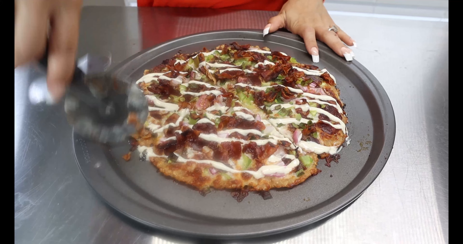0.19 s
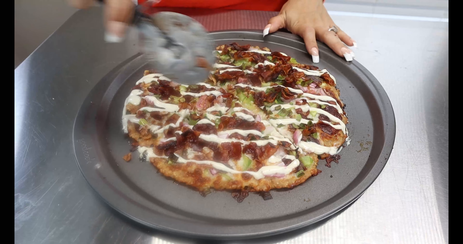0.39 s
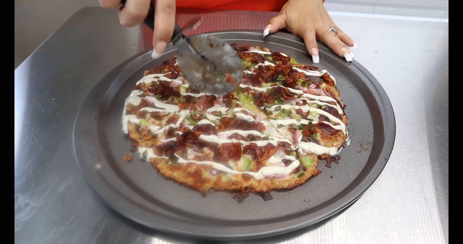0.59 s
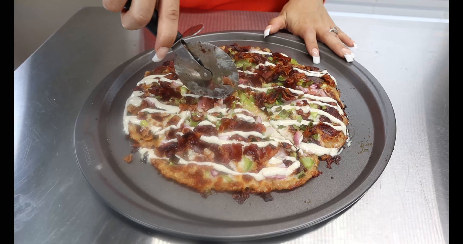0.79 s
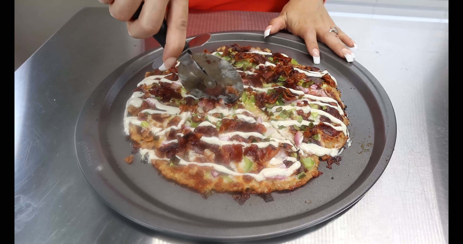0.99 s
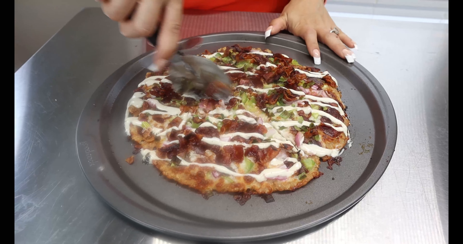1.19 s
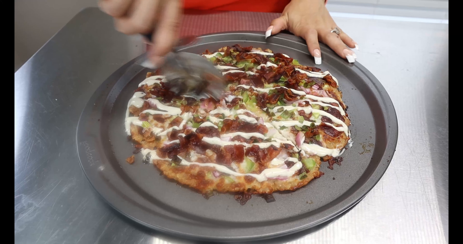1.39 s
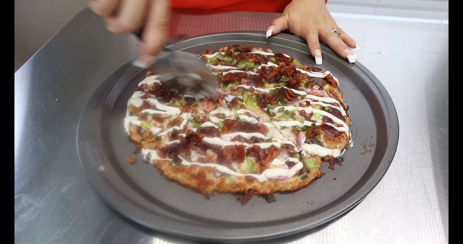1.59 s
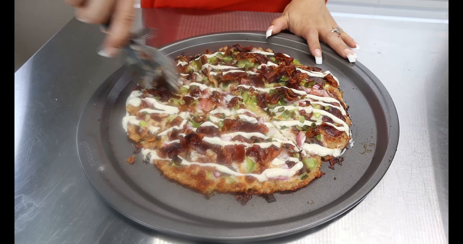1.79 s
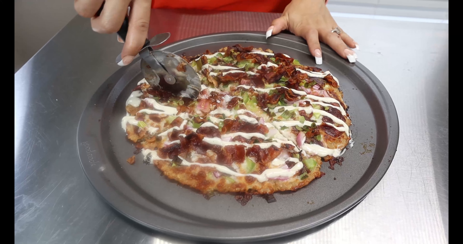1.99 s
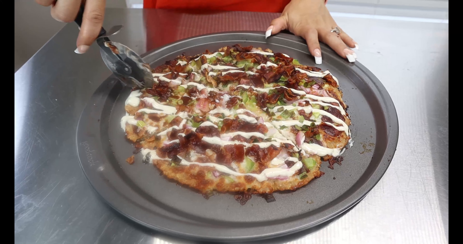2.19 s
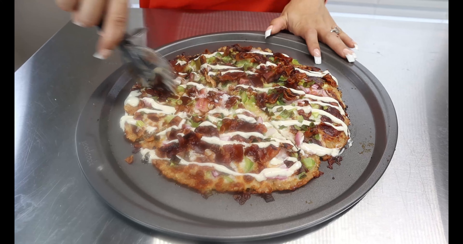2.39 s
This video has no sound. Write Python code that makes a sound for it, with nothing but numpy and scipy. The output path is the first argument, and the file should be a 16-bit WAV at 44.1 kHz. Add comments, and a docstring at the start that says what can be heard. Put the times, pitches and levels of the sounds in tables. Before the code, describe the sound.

Pizza cutter on a metal pan, close, in a quietly murmuring kitchen. Soft rolling and faint blade ticks open; at 0.24 s a hard, short, distorted clank bursts out, its echo fading over about half a second. The loose blade rattles around 0.74 s. A crust snap hits at 1.05 s, a pan knock at 1.2 s, then quieter rumbling, crunching strokes repeat from 1.33 to 2.4 s.

```python
"""Over the low murmur of a kitchen, a soft roll and ticks of a loose blade lead to a hard clank:
a pizza wheel lands on a metal pan, close to the microphone, and the kitchen rings on.
The blade bites into the crust, knocks the pan on the counter and rolls in short crunching strokes.
Blows and rings are dying sine modes; cracks, ticks, snaps and knocks are coloured noise bursts;
rolling is swelling trains of random clicks, and the air and the pan's drone are shaped noise."""
import sys
import numpy as np
from scipy import signal
from scipy.fft import rfft, irfft
from scipy.io import wavfile
from scipy.ndimage import uniform_filter1d

SR = 44100
rng = np.random.default_rng(int(sys.argv[2]) if len(sys.argv) > 2 else 0)


def waveform_to_disk(signal):
    """Save audio, clipped to [-1, 1], as 16-bit WAV at the path in sys.argv[1]."""
    frames = np.transpose(np.atleast_2d(signal))
    scaled = np.clip(frames, -1, 1) * 32767
    samples = np.round(scaled).astype(np.int16)
    wavfile.write(sys.argv[1], SR, samples)


N = 110250
T = np.arange(N) / SR
HZ = np.fft.rfftfreq(N, 1 / SR)

# room air: (frequency [Hz], relative density [dB])
AIR_SPECTRUM = [(20, -51), (60, -8.5), (130, 10), (200, -1.5), (310, 5.5), (500, -2.5), (800, -7),
                (1600, -13), (4000, -21.5), (15000, -42.5)]
AIR_DB = -51
# decay of the kitchen: (frequency [Hz], t60 [s])
KITCHEN_DECAY = [(80, 0.55), (500, 0.48), (2500, 0.67), (6500, 0.62), (10000, 0.52), (15000, 0.36)]
TICK_ROOM_DB, CUT_ROOM_DB, KNOCK_ROOM_DB = -17, -13, -11.5  # sends to the room

# drone of the pan while the wheel presses on it: (time [s], level [dB])
PRESSURE_LEVEL = [(0, -48), (.4, -52.5), (.9, -58.5), (1.15, -48.5), (1.35, -54), (1.65, -42.5),
                  (1.8, -48.5), (2.05, -44.5), (2.5, -47.5)]
# its colour: (frequency [Hz], relative density [dB])
DRONE_SPECTRUM = [(25, -14), (55, 2.5), (120, -2), (152, -10.5), (174, 1.5), (200, -4.5), (240, 6.5),
                  (300, -5), (480, -6.5), (700, -19), (2000, -73.5)]

# modes of the disc: (frequency [Hz], relative level [dB], t60 [s])
DISC_MODES = [(3400, -12, .04), (5380, 0, .075), (8220, -6, .05), (10850, -5, .08), (12700, -9, .07)]
DISC_PEAK_DB, DISC_WIDTH_HZ = 2.5, 220  # lift at a mode of 0 relative distance, half-width
# ticks of the loose blade: (time [s], level [dB], centre [Hz], t60 [s])
BLADE_TICKS = [(0.032, -40, 5500, 0.014), (.067, -42, 12300, 0.025), (.2088, -40, 3150, 0.024),
               (0.309, -34, 12400, 0.031), (0.4, -32, 12200, 0.017), (0.457, -34, 10300, 0.03),
               (0.471, -44, 13000, 0.018), (.623, -37, 9140, 0.01), (0.711, -46, 6950, 0.009),
               (0.7302, -46, 5230, 0.022), (0.7385, -26, 6270, 0.023), (0.7443, -34, 4223, 0.029),
               (.751, -32, 4550, 0.041), (0.7544, -28.5, 3280, 0.0099), (.7703, -42, 12100, 0.0079),
               (.905, -47.5, 9000, .005), (0.9845, -31.5, 5850, 0.01), (0.9855, -34, 2220, 0.016),
               (.9922, -41.5, 6600, 0.019), (1.3424, -33.5, 7400, 0.0032), (1.4613, -44.5, 7090, 0.0033),
               (1.6682, -42.5, 12000, 0.0047), (2.4555, -47.5, 10930, 0.0068)]
TICK_OCTAVES = 0.92  # from the centre to the half-power point
TICK_CLICK = .7  # first push relative to the rough part
# glancing touches that ring the disc: (time [s], level [dB], tilt [dB per octave])
DISC_RINGS = [(0.0275, -40.5, -6.5), (0.397, -48, 11), (0.7286, -44, -12), (0.7378, -44, -3)]

# snaps of the crust: (time [s], level [dB], centre [Hz], t60 [s])
CRUST_SNAPS = [(1.0472, -19.5, 5830, 0.015), (1.043, -36, 4440, 0.024), (1.057, -38, 5450, 0.015),
               (1.1563, -32.5, 5960, 0.006), (1.387, -43.5, 6050, 0.028), (1.524, -43, 7400, 0.034),
               (1.5392, -40.5, 8130, 0.04), (1.538, -35.5, 1770, 0.09), (1.8664, -38, 6600, 0.0087),
               (1.863, -36.5, 1963, 0.058), (1.886, -41, 4250, 0.032), (1.9318, -41.5, 6900, 0.029),
               (2.041, -38.5, 5140, 0.008), (2.171, -47, 5450, 0.011), (2.1934, -45, 5600, 0.02),
               (2.407, -43, 5050, 0.0043)]
SNAP_OCTAVES, SNAP_SKIRT_DB = 0.085, -16  # width of the peak, broad part beneath it

# knocks of the pan on the counter: (time [s], level [dB], t60 [s], tilt [dB per octave])
PAN_KNOCKS = [(1.047, -35, 0.078, -6.5), (1.0615, -38.5, 0.12, -4), (1.1931, -19.5, 0.023, 3.5),
              (1.1983, -30, 0.34, 1), (1.2272, -29, 0.037, 3)]
# their common colour: (frequency [Hz], relative density [dB])
KNOCK_SPECTRUM = [(25, -14), (70, 12), (150, 7.5), (350, 8), (550, -1), (850, 0.5), (1500, -13.5),
                  (3200, -19), (5000, -35), (9000, -42), (15000, -76)]
KNOCK_CLICK = 0.96  # first push relative to the rough part

# drops over lumps in the crust onto the pan: (time [s], level [dB], pitch of the pan's ring [Hz])
LUMP_JOLTS = [(1.498, -37, 470), (1.540, -37.5, 340), (1.693, -45, 230), (1.844, -38, 880),
              (1.861, -34, 614), (2.056, -36.5, 506), (2.179, -37.5, 1400), (2.207, -37, 280),
              (2.393, -41, 175)]
JOLT_T60, JOLT_RING_DB, JOLT_RING_T60 = 0.039, -5.5, 0.15  # s, dB relative to the jolt, s

# strokes through the crust: (peak time [s], rise [s], fall [s], rumble level [dB], crunch level [dB])
CUT_STROKES = [(.02, 0.032, 0.088, -50.5, -54.5), (0.211, 0.033, 0.12, -44, -53),
               (1.051, 0.011, 0.046, -47, -43), (1.17, 0.017, 0.093, -53, -59),
               (1.334, 0.029, 0.038, -47.5, -57), (1.546, 0.058, 0.057, -44.5, -51.5),
               (1.723, 0.04, 0.038, -46.5, -59), (1.866, 0.03, 0.057, -37.5, -49),
               (1.89, 0.0068, 0.0091, -55, -43), (1.944, .02, 0.018, -60, -49.5),
               (2.049, 0.034, 0.038, -44.5, -56.5), (2.203, 0.031, 0.039, -39.5, -47.5),
               (2.39, 0.036, 0.033, -48, -53.5)]
# the pan under the rolling wheel: (frequency [Hz], relative density [dB])
RUMBLE_SPECTRUM = [(40, -18), (130, 1), (250, 1), (400, -0.5), (560, 3), (800, -5), (1300, -7),
                   (2000, -13.5), (3000, -27), (15000, -56)]
# the breaking crust: (frequency [Hz], relative density [dB])
CRUNCH_SPECTRUM = [(200, -11.5), (1000, -4.5), (1800, 3), (3500, 1.5), (6500, -2.5), (10500, -9),
                   (15500, -9)]
BUMPS_PER_S, BUMP_SPREAD_DB = 1100, 3
CRUMBS_PER_S, CRUMB_SPREAD_DB = 1700, 2.8
CRUMB_CYCLES = 2.5  # cycles for a pitched crumb to fall to 1/e
PITCHED_DB, CRUNCH_HISS = 3, 0.65  # dB and gain, both relative to the plain crumbs
CLUMP_S, CLUMP_DB = .007, 2.8  # smoothing time, rms swing
RIPPLE_DB, RIPPLE_HZ = 2.6, 40  # rms swing, spacing of the random points
SCRAPE_DB, SCRAPE_HZ = -56.5, 11000  # level at the strongest crunch, low cut
SCRAPE_FOLLOW = .65  # exponent: the scrape swells less than the crunch

# hard blow of the wheel on the pan
CLANK_S = .2351
# frequencies of wheel and pan: (frequency [Hz])
CLANK_PITCHES = [240, 684, 1240, 1936, 2455, 3036, 3248, 4500, 5100, 6414, 8280]
# the same modes in order: (level [dB], t60 [s])
CLANK_DECAYS = [(-16, 0.028), (-26.5, 0.12), (-6, 0.018), (6, 0.011), (3, 0.015), (4.5, 0.017), (-8, 0.022),
                (-15.5, 0.02), (-10.5, 0.017), (-4, 0.018), (-6.5, 0.012)]
# noisy crack of the blow: (frequency [Hz], relative density [dB])
CRACK_SPECTRUM = [(60, 3), (300, -16), (900, 9), (1500, 9.5), (2000, 10), (3200, 17), (3900, 1), (9000, -5),
                  (16000, -22)]
CRACK_T60, CRACK_DB = 0.0078, 2.5  # s, dB
CRACK_CLICK = 1.1  # first push relative to the rough part
# the kitchen's answer to the clank: (frequency [Hz], relative density [dB])
ECHO_SPECTRUM = [(40, -9.5), (270, -4), (450, -8), (680, -3.5), (900, -16), (1250, -10.5), (1600, -10),
                 (1950, 2.5), (2200, -9), (2450, 2), (2800, -5.5), (3200, 2), (3650, -15.5), (4500, -19.5),
                 (5200, -13), (5800, -14.5), (6400, -10), (7200, -22), (8400, -16.5), (10500, -33),
                 (15500, -38.5)]
ECHO_DB, ECHO_BUILD_S, ECHO_HOLD_S = -24, 0.007, 0.059
RING_DB, RING_T60 = -38.5, .42  # faint long ring: dB added to the echo spectrum, s

CLIP_LEVEL = 1.0  # ceiling of the microphone, full scale
EDGE_HZ = 15850  # upper limit of the sound


def amp(db):
    """Decibels to gain."""
    return 10 ** (np.asarray(db) / 20)


def unit(x):
    """Scales to rms 1."""
    return x / np.sqrt(np.mean(x ** 2) + 1e-20)


def read(points, hz):
    """Reads a spectrum on a log-frequency axis."""
    f, value = np.transpose(points)
    return np.interp(np.log(hz + 1), np.log(f + 1), value)


def add(mix, s, sound):
    """Mixes a sound in at a time, cut off at the end of the scene."""
    part = mix[max(round(s * SR), 0):][:len(sound)]
    part += sound[:len(part)]


def dying(t, t60):
    """Exponential decay, down 60 dB at t60."""
    return np.exp(-np.log(1000) * t / t60)


def colour(x, curve_db, size=4096):
    """Minimum-phase filter of unit energy; curve_db gives dB for frequencies."""
    hz = abs(np.fft.fftfreq(size, 1 / SR))
    log_gain = np.log(amp(curve_db(hz)) + 1e-6)
    response = np.exp(np.conj(signal.hilbert(log_gain)))
    taps = np.fft.ifft(response).real[:size // 2]
    return signal.fftconvolve(x, taps / np.linalg.norm(taps))[:len(x)]


def noise(points):
    """Steady noise of a given spectrum, at rms 1."""
    spectrum = rfft(rng.standard_normal(N)) * amp(read(points, HZ))
    return unit(irfft(spectrum, N))


def burst(t60, curve_db, click=0, size=12000):
    """A rough contact that dies quickly, coloured; click is the strength of its first push."""
    rough = rng.choice([-1., 1.], size) * dying(T[:size], t60)
    push = click * np.linalg.norm(rough) * (T[:size] == 0)
    return colour((rough + push) / np.hypot(1, click), curve_db)


def grains(per_s, spread_db):
    """Random clicks of uneven size and either sign, at rms 1."""
    size = amp(spread_db * np.minimum(rng.exponential(1, N), 4))
    sign = rng.choice([-1., 1.], N)
    return unit(size * sign * (rng.random(N) < per_s / SR))


def mode(hz, db, t60):
    """One dying partial, half a second long."""
    t = T[:SR // 2]
    return amp(db) * dying(t, t60) * np.sin(2 * np.pi * hz * t)


def ripple(hz):
    """The pan's many weak modes, as random peaks and dips in dB."""
    grid = np.arange(0, SR / 2, RIPPLE_HZ)
    return RIPPLE_DB * np.interp(hz, grid, rng.standard_normal(len(grid)))


def disc_colour(hz):
    """The disc's modes lift whatever passes through it, in dB."""
    return DISC_PEAK_DB * sum(1 / (1 + ((hz - row[0]) / DISC_WIDTH_HZ) ** 2) for row in DISC_MODES)


def room_tail(hold_s):
    """Diffuse reflections that hold for hold_s, then die band by band."""
    hz, t, bands = signal.stft(rng.standard_normal(SR), SR, nperseg=256)
    decay = dying(np.maximum(t - hold_s, 0), read(KITCHEN_DECAY, hz)[:, None])
    return signal.istft(bands * decay, SR, nperseg=256)[1]


def background():
    """Room air: steady noise, strongest in the lows."""
    return amp(AIR_DB) * noise(AIR_SPECTRUM)


def drone():
    """The pan murmurs on the counter under the hand's pressure."""
    return noise(DRONE_SPECTRUM) * amp(np.interp(T, *np.transpose(PRESSURE_LEVEL)))


def blade():
    """The disc rattles on its axle and now and then rings."""
    out = np.zeros(N)
    for s, db, hz, t60 in BLADE_TICKS:
        def shape(f):
            octaves = np.log2((f + 1) / hz)
            return disc_colour(f) - 10 * np.log10(1 + (octaves / TICK_OCTAVES) ** 4)
        add(out, s, amp(db) * burst(t60, shape, TICK_CLICK))
    pivot_hz = DISC_MODES[1][0]  # the tilt turns about the second mode
    for s, db, tilt in DISC_RINGS:
        ring = sum(amp(tilt * np.log2(row[0] / pivot_hz)) * mode(*row) for row in DISC_MODES)
        add(out, s, amp(db) * ring)
    return out


def snaps():
    """Single pieces of crust break, each burst peaking at its own pitch."""
    out = np.zeros(N)
    for s, db, hz, t60 in CRUST_SNAPS:
        def shape(f):
            peak = np.exp(-.5 * (np.log2((f + 1) / hz) / SNAP_OCTAVES) ** 2)
            return 20 * np.log10(peak + amp(SNAP_SKIRT_DB) * np.minimum(f / hz, 1))
        add(out, s, amp(db) * burst(t60, shape))
    return out


def knocks():
    """The wheel breaks through and the pan bumps the counter."""
    out = np.zeros(N)
    for s, db, t60, tilt in PAN_KNOCKS:
        def shape(f):
            return read(KNOCK_SPECTRUM, f) + tilt * np.log2((f + 20) / 500)
        add(out, s, amp(db) * burst(t60, shape, KNOCK_CLICK))
    return out


def jolts():
    """The wheel drops onto the pan, which rings at a pitch set by the spot."""
    out = np.zeros(N)
    for s, db, hz in LUMP_JOLTS:
        add(out, s, amp(db) * burst(JOLT_T60, lambda f: read(RUMBLE_SPECTRUM, f)))
        add(out, s, mode(hz, db + JOLT_RING_DB, JOLT_RING_T60))
    return out


def pitched_crumbs(per_s, count=14):
    """Tiny fractures, each a few cycles at one of several pitches."""
    out = np.zeros(N)
    for hz in np.geomspace(1500, 14000, count):
        ping = mode(hz, 0, np.log(1000) * CRUMB_CYCLES / hz)[:1024]
        clicks = grains(per_s / count, CRUMB_SPREAD_DB)
        out += unit(signal.oaconvolve(clicks, ping)[:N]) * np.sqrt(hz)
    return unit(out)


def clumps():
    """The crust gives way unevenly: a random gain that wavers within milliseconds."""
    waver = uniform_filter1d(rng.standard_normal(N), max(int(CLUMP_S * SR), 2))
    return unit(amp(CLUMP_DB * unit(waver)))


def rolling():
    """Each stroke rumbles through the pan, crushes crumbs and rubs the disc along the cut."""
    rumble, crunch = np.zeros(N), np.zeros(N)
    for s, rise, fall, rumble_db, crunch_db in CUT_STROKES:
        swell = np.exp(-(abs(T - s) / np.where(T < s, rise, fall)) ** 2)
        rumble += amp(rumble_db) * swell
        crunch += amp(crunch_db) * swell
    bumps = grains(BUMPS_PER_S, BUMP_SPREAD_DB)
    crumbs = grains(CRUMBS_PER_S, CRUMB_SPREAD_DB)
    crumbs += amp(PITCHED_DB) * pitched_crumbs(CRUMBS_PER_S)
    crumbs = unit(crumbs + CRUNCH_HISS * rng.standard_normal(N))
    scrape_level = amp(SCRAPE_DB) * (crunch / crunch.max()) ** SCRAPE_FOLLOW
    scrape = scrape_level * rng.standard_normal(N)

    def scrape_colour(f):
        low_cut = 10 * np.log10(1 + (SCRAPE_HZ / (f + 1)) ** 4)
        return disc_colour(f) + ripple(f) - low_cut

    pan = colour(rumble * bumps, lambda f: read(RUMBLE_SPECTRUM, f) + ripple(f))
    crust = colour(crunch * crumbs * clumps(), lambda f: read(CRUNCH_SPECTRUM, f) + disc_colour(f))
    return pan + crust + colour(scrape, scrape_colour)


def clank():
    """The wheel hits the pan: a crack, damped modes, a faint ring and the kitchen's echo."""
    out = np.zeros(N)
    for k, (hz, (db, t60)) in enumerate(zip(CLANK_PITCHES, CLANK_DECAYS)):
        ring = mode(hz, RING_DB + read(ECHO_SPECTRUM, hz), RING_T60)
        add(out, CLANK_S, (-1) ** k * (mode(hz, db, t60) + ring))  # neighbours of opposite sign
    crack = burst(CRACK_T60, lambda f: read(CRACK_SPECTRUM, f), CRACK_CLICK)
    add(out, CLANK_S, amp(CRACK_DB) * crack)
    echo = colour(room_tail(ECHO_HOLD_S), lambda f: read(ECHO_SPECTRUM, f) + ripple(f))
    build = np.minimum(T[:len(echo)] / ECHO_BUILD_S, 1)
    add(out, CLANK_S, amp(ECHO_DB) * echo * build)
    return out


def scene():
    """All sources in the kitchen; the snaps stay dry and the clank brings its own echo."""
    ticks, cut, bumps = blade(), rolling() + jolts(), knocks()
    tail = room_tail(0)
    send = amp(TICK_ROOM_DB) * ticks + amp(CUT_ROOM_DB) * cut + amp(KNOCK_ROOM_DB) * bumps
    room = signal.fftconvolve(send, tail / np.linalg.norm(tail))[:N]
    return (background() + drone() + room + ticks + snaps() + bumps + cut + clank())[None]


def record(dry):
    """The clank overloads the microphone, a soft tanh ceiling; then the band limit."""
    clipped = CLIP_LEVEL * np.tanh(dry / CLIP_LEVEL)
    low_pass = signal.firwin(255, EDGE_HZ, window=("kaiser", 8), fs=SR)
    return signal.oaconvolve(clipped, low_pass[None], "same")


dry = scene()
out = record(dry)
waveform_to_disk(out)
```